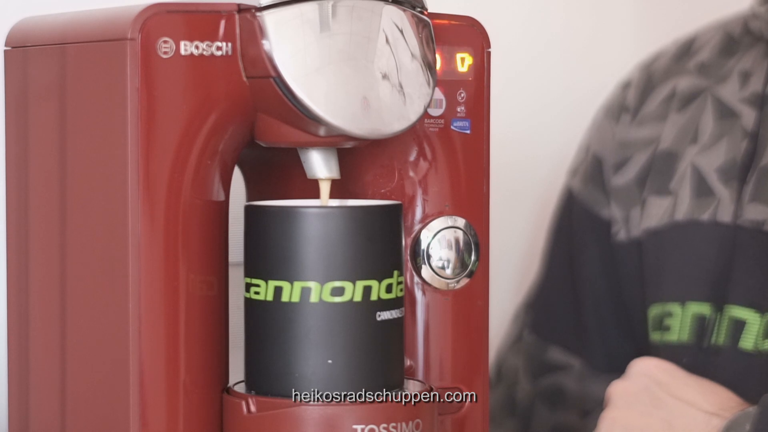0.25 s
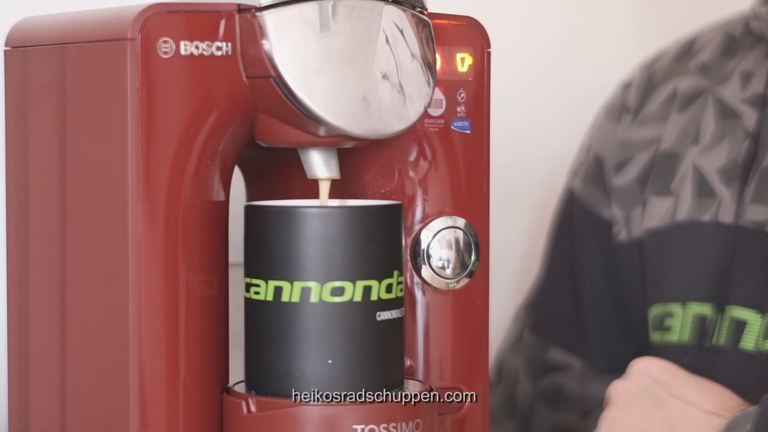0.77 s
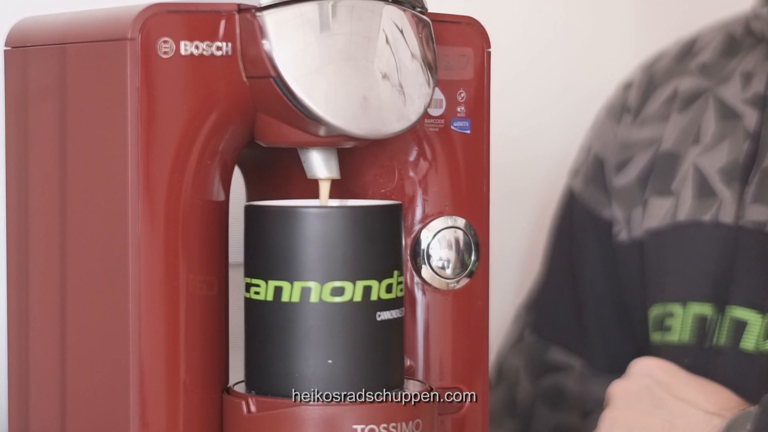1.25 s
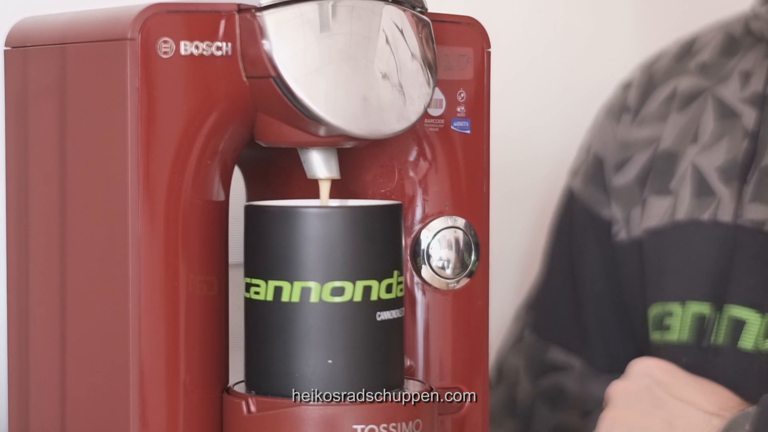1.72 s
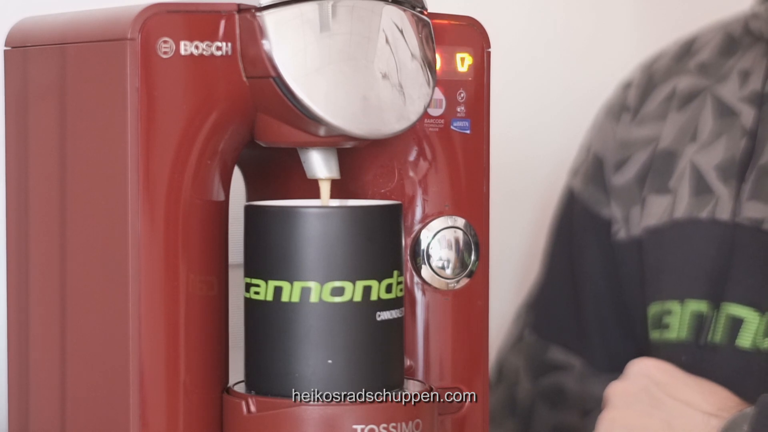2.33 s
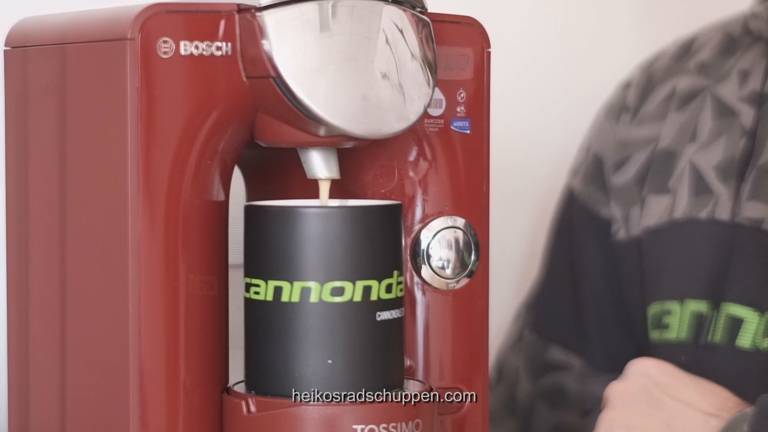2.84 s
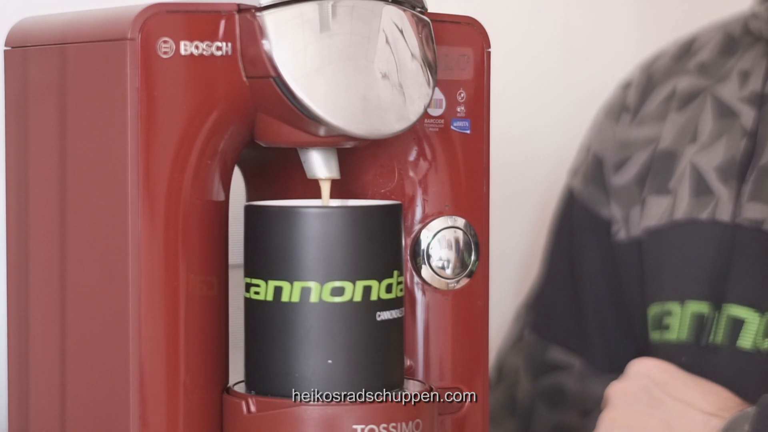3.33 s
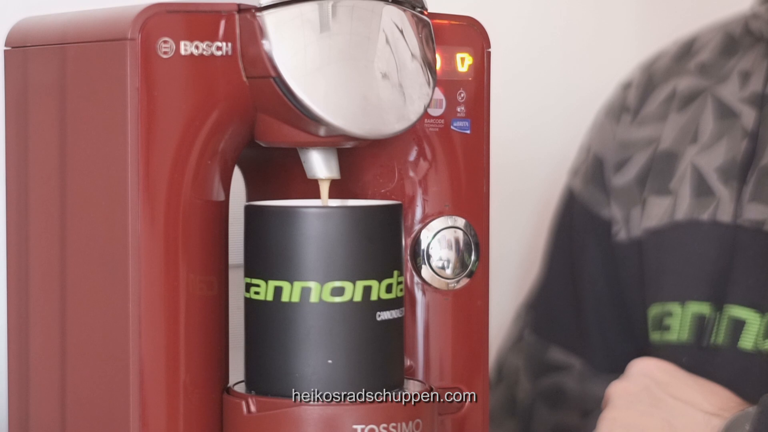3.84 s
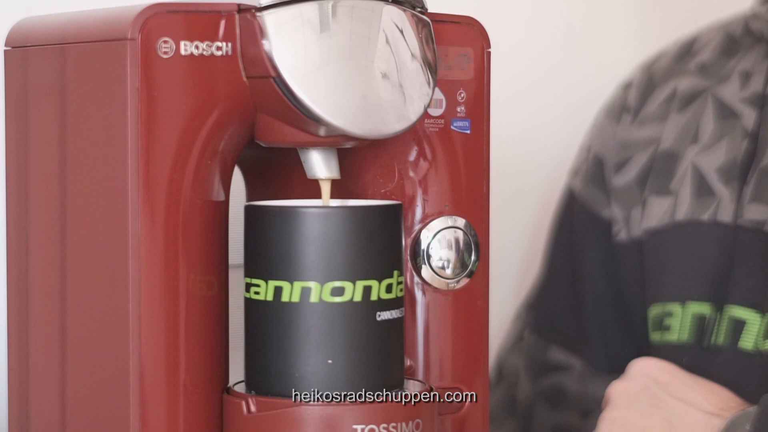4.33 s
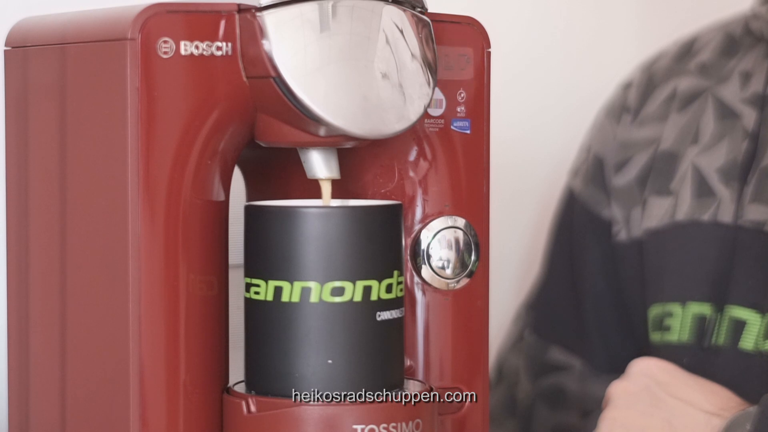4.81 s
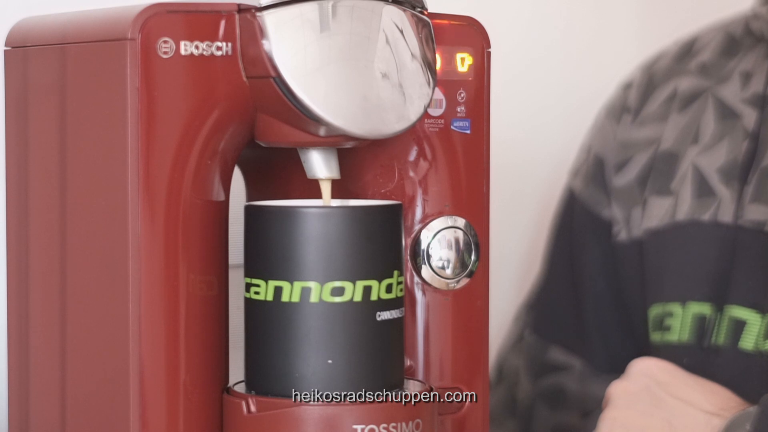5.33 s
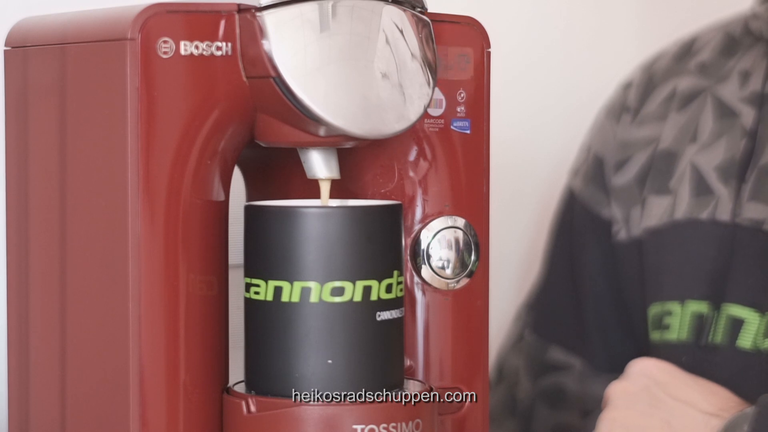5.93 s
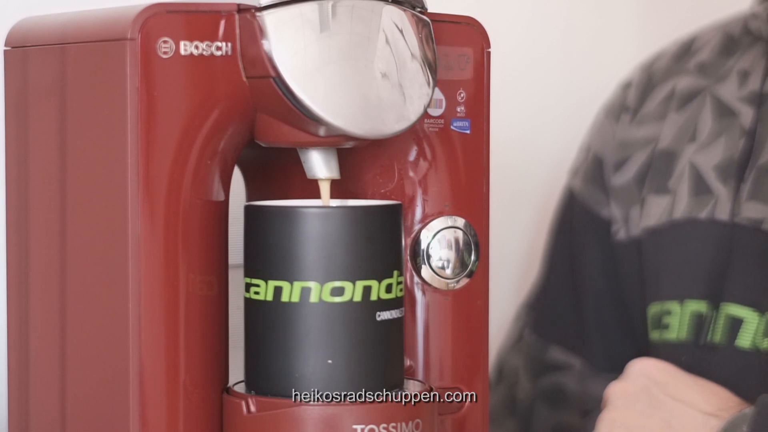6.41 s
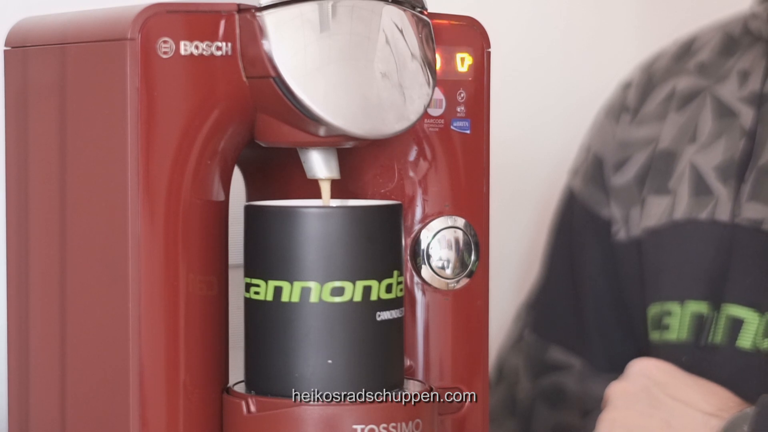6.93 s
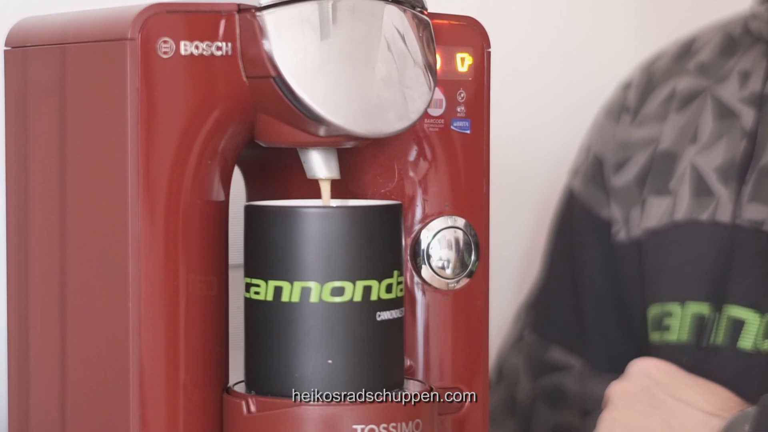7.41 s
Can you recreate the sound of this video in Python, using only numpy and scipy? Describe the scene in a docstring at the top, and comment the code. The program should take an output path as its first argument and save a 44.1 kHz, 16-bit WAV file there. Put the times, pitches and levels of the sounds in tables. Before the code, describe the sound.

A steady electric pump hum with a light rattle and a faint pour of coffee opens the sound, then stops after about three seconds. Quiet crackling and ticking of heating water gives way to louder wet sputtering and bursts of steam hiss, ringing hollowly in a mug. Near the end the coffee machine vents with a single hollow thump and a few feeble spurts. The microphone is close, in a small, still room.

```python
"""A capsule coffee machine fills a mug, close by in a small, quiet room.
First its mains-driven piston pump buzzes and rattles while coffee pours; near 3 s it cuts out.
Water then simmers and ticks in the heater. From 4.7 s steam drives the last coffee through the
spout in gurgling, hissing spurts. At 7.1 s the brewing chamber vents with one hollow thump,
and a few weak spurts follow."""
import sys
import numpy as np
from scipy import signal
from scipy.fft import rfft, irfft
from scipy.io import wavfile
from scipy.ndimage import uniform_filter1d

SR = 44100
rng = np.random.default_rng(int(sys.argv[2]) if len(sys.argv) > 2 else 0)


def wav_record(signal):
    """Record a signal, one row per channel, as 16-bit PCM in the file named by sys.argv[1]."""
    frames = np.transpose(np.atleast_2d(signal))
    bounded = np.clip(frames, -1, 1)
    # unit amplitude maps onto the largest positive 16-bit level
    quanta = np.round(bounded * 32767).astype(np.int16)
    wavfile.write(sys.argv[1], SR, quanta)


N = 337806
TIME = np.arange(N) / SR
MAINS_HZ = 49.9955  # also the pump's stroke rate
EMPTYING_S = (4.4, 6.57)  # the capsule runs dry between these times


def undb(db):
    """Decibels to gain."""
    return np.exp(np.asarray(db) * (np.log(10) / 20))


def unit(x):
    """Scale to rms 1."""
    return x / np.sqrt(np.mean(x ** 2) + 1e-18)


def walk(rate):
    """Random levels held 1 / rate s and slewed; rms 1."""
    hold = max(int(SR / rate), 1)
    return unit(uniform_filter1d(rng.standard_normal(N)[np.arange(N) // hold], hold))


def burst(start, decay, rise):
    """Envelope with a quick attack and an exponential decay."""
    age = np.maximum(TIME - start, 0)
    return (1 - np.exp(-age / rise)) * np.exp(-np.minimum(age / decay, 40))


def swell(start, rise, length, fall, sag_db=0):
    """Envelope that rises, sags by sag_db a second, and releases after its length."""
    age = np.maximum(TIME - start, 0)
    release = np.exp(-np.clip((age - length) / fall, 0, 40))
    return np.minimum(age / rise, 1) * undb(-sag_db * age) * release


def together(envelopes):
    """Joint level of overlapping noisy sounds: their powers add."""
    return np.sqrt(sum(e ** 2 for e in envelopes))


def shape(x, gain_at, size=8192):
    """Minimum-phase EQ from a gain curve: it rings after the blow, never before."""
    hz = np.maximum(np.arange(size // 2 + 1) * SR / size, 1)
    cepstrum = irfft(np.log(gain_at(hz) + 1e-6))
    cepstrum[1:size // 2] *= 2
    cepstrum[size // 2 + 1:] = 0
    impulse = irfft(np.exp(rfft(cepstrum)))
    return signal.fftconvolve(x, impulse)[:len(x)]


def colour(x, points):
    """EQ through (f/Hz, level/dB) points, with steep skirts beyond the ends."""
    f, db = np.transpose(points)
    skirt = lambda hz: np.minimum(1, np.minimum(hz / f[0], f[-1] / hz)) ** 4
    return shape(x, lambda hz: undb(np.interp(np.log(hz), np.log(f), db)) * skirt(hz))


def ringing(modes, hz):
    """Gain of (f/Hz, width/Hz, level/dB) resonances; neighbours cancel in the valleys."""
    return np.abs(sum(undb(db) / (1 + 2j * (hz - f) / width) for f, width, db in modes))


def resonate(x, modes, low_hz, high_hz):
    """Ring a body that radiates between two edges; white noise keeps its level."""
    rolloff = lambda hz: np.sqrt((1 + (low_hz / hz) ** 12) * (1 + (hz / high_hz) ** 12))
    return shape(x, lambda hz: unit(ringing(modes, hz) / rolloff(hz)))


def pops(rate, spread_db):
    """Crackle: random clicks of uneven size; rms 1."""
    size = undb(spread_db * np.minimum(rng.exponential(size=N), 4))
    return unit((rng.random(N) < rate / SR) * size * rng.choice([-1, 1], N))


def bubbles(rate, low_hz, high_hz, cycles, spread_db):
    """Small air bubbles, each a short ring that rises a little in pitch; rms 1."""
    out, age = np.zeros(N + 2048), TIME[:2048]
    for when, pitch, size in rng.random((int(rate * N / SR), 3)):
        hz, at = low_hz * (high_hz / low_hz) ** pitch, int(when * N)
        life = age * hz / cycles
        chirp = 1 + .03 * np.minimum(life, 4)
        ring = np.sin(2 * np.pi * hz * age * chirp) * np.exp(-life)
        out[at:at + len(age)] += ring * undb(-spread_db * np.log(.03 + size))
    return unit(out[:N])


# EQ of the room bed: f/Hz, level/dB
ROOM_EQ = [(25, -14), (59, -6), (107, -8.5), (200, -13.5), (582, -14), (970, -17.5), (3530, -22),
           (5400, -20.5), (6400, -22), (6920, -26), (15500, -25.5)]

def room_tone(level_db=-41.5):
    """Faint rumble and hiss of the still room."""
    return unit(colour(rng.standard_normal(N), ROOM_EQ)) * undb(level_db)


# EQ of the reflected sound: f/Hz, level/dB
REVERB_EQ = [(60, -23), (200, -25), (350, -18), (700, -13), (1400, -10), (2800, -6.5), (5600, -5.5),
             (16000, -7)]

def reflections(x, t60=0.27):
    """Short, bright reverb off the counter and walls."""
    age = TIME[:SR // 2]
    tail = rng.standard_normal(len(age)) * np.exp(-np.log(1000) * age / t60) * (age > .001)
    tail /= np.sqrt(np.sum(tail ** 2))
    return colour(signal.fftconvolve(x, tail)[:N], REVERB_EQ)


def draining(x, modes, low_hz, high_hz):
    """Crossfade a cavity's ring from full to empty as the coffee runs out."""
    full = resonate(x, [(hz, width, db) for hz, width, db, _ in modes], low_hz, high_hz)
    empty = resonate(x, [(hz, width, db) for hz, width, _, db in modes], low_hz, high_hz)
    drained = np.interp(TIME, EMPTYING_S, [0, 1])
    return (1 - drained) * full + drained * empty


# Air modes of mug and capsule: f/Hz, width/Hz, level full/dB, level empty/dB
MUG_MODES = [(191, 8.9, -5, -13), (245.4, 8.1, 3.5, 4.5), (342, 48, -11, -7), (410.6, 25.6, 3.5, 1),
             (562.7, 16, 8, -1), (618, 23, -1.5, -4), (667, 16, 0, 1), (705, 23, 4, -11),
             (750, 26, 1.5, -8), (807, 23.3, 1.5, 7), (846.3, 14.4, 1.5, 6.5), (920, 28, -8, -5)]

def mug(x):
    """The hollow ring of the mug and capsule."""
    return draining(x, MUG_MODES, 210, 907)


# Modes of the spout's throat: f/Hz, width/Hz, level full/dB, level empty/dB
THROAT_MODES = [(1358, 27, 3.5, 0.5), (1494, 65, 2.5, 6.5), (1631, 180, -0.5, 2.5), (1985, 130, 1.5, -5.5),
                (2186, 102, 2, -0.5), (2520, 43, -3, -6), (2750, 68, -7, -17)]

def throat(x):
    """The higher ring of the spout's throat."""
    return draining(x, THROAT_MODES, 1200, 3400)


def heater_shell(x):
    """The heater's casing muffles the treble; rms 1."""
    return unit(colour(x, [(130, 2.5), (900, 3), (2100, 4.5), (3100, -12), (8000, -13)]))


# Surges of the boil: t/s, attack/s, length/s, level/dB
BOIL_SURGES = [(3.14, 0.018, 0.31, -39), (3.37, 0.017, 0.036, -36.5), (3.472, .02, 0.05, -39.5),
               (3.557, .01, 0.035, -41.5), (3.87, 0.024, 0.31, -41), (4.132, 0.018, 0.034, -31.5),
               (4.221, 0.027, 0.081, -31.5), (4.334, 0.071, 0.33, -39)]

def simmer(chug_hz=25.1, chug_fade_s=(3.3, 4.5)):
    """Water boils up in surges: the first steam bubbles chug through, then the crackle evens out."""
    crackle = undb(-8) * heater_shell(pops(1500, 3.4))
    crackle += undb(-8.5) * mug(pops(1500, 1.1))
    crackle += undb(-11.5) * throat(pops(1500, 1.7))
    phase = (TIME - BOIL_SURGES[0][0] + .002 * walk(8)) * chug_hz % 1
    chug = unit(np.exp(-phase / .3) + .35)
    tremolo = 1 + (chug - 1) * np.interp(TIME, chug_fade_s, [1, 0])
    boil = together(undb(db) * swell(start, rise, length, fall=.062)
                    for start, rise, length, db in BOIL_SURGES)
    return (crackle + undb(-10) * bubbles(260, 654, 2770, 1.8, 2.2)) * tremolo * boil


# Ticks in the heater: t/s, level/dB, f/Hz, t60/s
HEATER_TICKS = [(3.41, -18.5, 970, .018), (3.422, -24.5, 766, 0.048), (3.49, -27.5, 934, 0.044),
                (3.52, -29.5, 685, .04), (3.593, -23.5, 1400, 0.01), (3.65, -36, 1310, 0.06),
                (3.9, -40, 2165, 0.49), (3.944, -18, 1970, 0.0023), (4.696, -20.5, 2040, 0.041),
                (4.752, -22.5, 2150, .04)]

def ticks(trim_db=2.5, crack_db=-7.5):
    """Larger bubbles collapse in the heater, each with a crack and a ping."""
    shell = heater_shell(rng.standard_normal(N))
    wobble = walk(250)  # the bubbles change shape as they ring
    out = 0
    for start, db, hz, t60 in HEATER_TICKS:
        tone = np.sin(2 * np.pi * hz * (TIME - start) + wobble)
        ping = .8 * tone * burst(start, t60 / np.log(1000), .00028)
        crack = undb(crack_db) * shell * burst(start, .002, .0001)
        out += undb(db + trim_db) * (ping + crack)
    return out


def heater_bed(rumble_db=-47, whistle_db=-52.5):
    """Water rumbles until it turns to steam; a leak sings faintly throughout."""
    rumble = unit(colour(rng.standard_normal(N), [(70, .5), (400, 1), (600, -11.5)]))
    rumble *= np.interp(TIME, EMPTYING_S, [1, 0])
    whistle = resonate(rng.standard_normal(N), [(5745, 75, 0), (5610, 110, -9)], 5000, 6500)
    return undb(rumble_db) * rumble + undb(whistle_db) * whistle


def each_cycle(start, decay):
    """Envelope retriggered once in every pump cycle; rms 1."""
    return unit(np.exp(-((TIME - start) * MAINS_HZ % 1) / (MAINS_HZ * decay)))


# Ring of the valve: f/Hz, width/Hz, level/dB
VALVE_MODES = [(3080, 180, -10), (3430, 135, -1.5), (3895, 100, 0), (4980, 140, -14)]
# Fits of harder chatter: t/s, length/s, level/dB
VALVE_FITS = [(0.247, .13, -35), (.42, 0.087, -39), (0.51, .11, -38), (0.638, 0.12, -36.5),
              (0.924, 0.023, -34), (1.0, 0.2, -41.5), (1.423, 0.1, -38), (1.74, 0.033, -34),
              (2.08, .28, -40.5), (2.491, .24, -39)]
VALVE_S = 0.0094  # when in each cycle the valve snaps

def valve(settle_s=2.72, settle_db_per_s=38):
    """The valve snaps between strokes, chattering unevenly until full pressure calms it."""
    cycle = np.floor((TIME - VALVE_S + 5e-5 * walk(50)) * MAINS_HZ)
    clicks = unit(np.diff(cycle, prepend=-1))
    snap = unit(.8 * clicks + rng.standard_normal(N) * (each_cycle(VALVE_S, .0035) + .3))
    fits = [undb(db) * swell(start, .0053, length, fall=.01) for start, length, db in VALVE_FITS]
    chatter = together(fits + [undb(-43.5 + 2 * walk(14))])
    settling = undb(-settle_db_per_s * np.maximum(TIME - settle_s, 0))
    return resonate(snap, VALVE_MODES, 2660, 6400) * chatter * settling


# Pump hum as the casing radiates it: harmonic, level/dB
HUM_HARMONICS = [(1, -21.5), (2, -17), (3, -24.5), (4, 1), (5, -3), (6, -24.5), (7, -9.5), (8, -11.5),
                 (9, -4.5), (10, -25), (11, -25), (12, -11), (13, -18), (14, -24), (15, -25.5), (16, -16.5),
                 (17, -20.5), (18, -14), (19, -17.5), (20, -18), (21, -25.5), (22, -20), (23, -22.5),
                 (24, -23.5), (25, -22), (26, -23), (27, -14), (28, -21), (29, -27), (30, -17)]
# Shift in tone under pressure: harmonic, change/dB
STRAIN = [(13, 4), (14, 12), (15, 11.5), (18, -11), (21, -18), (23, 12), (24, 1), (27, -7), (43, 9)]
# The piston lands, rebounds and returns: t in the cycle/s, level/dB
PISTON_KNOCKS = [(0.0164, -3), (0.0206, -11.5), (0.025, -4.5)]
# Thin panels that sing along: f/Hz, width/Hz, level/dB
PANEL_MODES = [(1580, 61, 1.5), (1875, 35, 1), (2124, 57, 0), (2440, 61, -6)]

def pump_hum(drive, buzz_db=-33, panel_db=-21, darken=0.65, count=52, strain_s=(1.6, 2.97)):
    """Piston knocks ring the casing; a weaker stroke lands softly and loses its overtones."""
    orders = np.arange(1, count + 1)
    panels = ringing(PANEL_MODES, orders[len(HUM_HARMONICS):] * MAINS_HZ)
    buzz = np.hypot(undb(buzz_db), undb(panel_db) * panels)  # the panels carry the top overtones
    gains = np.concatenate([undb(np.array(HUM_HARMONICS)[:, 1]), buzz])
    # the knocks set the phases, the casing the levels; the panels scatter the high phases
    knocks = sum(undb(db) * np.exp(-2j * np.pi * MAINS_HZ * orders * at) for at, db in PISTON_KNOCKS)
    response = knocks / np.abs(knocks) * gains / np.sqrt(np.sum(gains ** 2) / 2)
    response *= np.exp(1j * rng.standard_normal(count) * (orders / 22) ** 2)
    # no two strokes share quite the same timing or force
    fundamental = np.exp(2j * np.pi * MAINS_HZ * (TIME + 2.5e-5 * walk(50)))
    wavers = [.7 * walk(2.5) + .9 * walk(40) for _ in range(7)]
    log_force = np.log(drive / drive.max())
    pressure, strain_db = np.interp(TIME, strain_s, [0, 1]), dict(STRAIN)
    out, partial = 0, 1
    for k, gain in zip(orders, response):
        partial = partial * fundamental
        change_db = min(k / 10, 2) * wavers[k % len(wavers)] + strain_db.get(k, 0) * pressure
        out -= np.real(gain * partial) * undb(change_db) * np.exp(darken * log_force * k / 10)
    return out * drive


# EQ of the loose panels' rattle: f/Hz, level/dB
RATTLE_EQ = [(60, -53), (170, -25), (400, -2), (650, -7.5), (1050, -11), (1550, -6.5), (2200, -8),
             (2800, -15.5), (4500, -21), (7500, -28), (15000, -31)]

def pump(hum_db=-21.5, off_s=2.957, coast_db_per_s=122):
    """The pump hums, shakes its panels, squirts through its valve and pours coffee, then coasts out."""
    running = undb(-np.clip(coast_db_per_s * (TIME - off_s), 0, 120))
    drive = undb(hum_db) * running
    landing = PISTON_KNOCKS[0][0]
    rattle = unit(colour(pops(9000, 3.5) * each_cycle(landing, .09), RATTLE_EQ))
    panels = resonate(rng.standard_normal(N) * each_cycle(landing, .0078), PANEL_MODES, 1500, 2400)
    chatter = undb(-1.5) * valve() * running ** 2
    squirt = rng.standard_normal(N) * each_cycle(VALVE_S - .0018, .002) * undb(3 * walk(20))
    squirt = unit(colour(squirt, [(4500, -9), (6500, -5), (9000, -7), (15000, -7)]))
    pour = bubbles(260, 482, 2330, 2.5, 3)
    texture = undb(-11) * rattle + undb(-20) * panels + undb(-29) * squirt + undb(-17) * pour
    # loose parts and the stream need a hard stroke, so they fade before the hum
    return pump_hum(drive) + drive * running * texture + chatter


# Pressure shocks: t/s, push/dB, crack/dB, pocket f/Hz, pocket level/dB
VENT_SHOCKS = [(7.082, -25, -13, 2220, -14), (7.084, -27, -21, 580, -7), (7.097, -15.5, -17, 563, -14),
               (7.118, -22, -21, 302, -15), (7.135, -20.5, -23, 240, -28)]
# Ring of the brewing chamber: f/Hz, level/dB, t60/s
CHAMBER_MODES = [(195.5, -7.5, 0.3), (247, -3.5, 0.34), (343, -11, 0.15), (430, -4.5, 0.18),
                 (550, -4, 0.09), (707, -12.5, 0.24), (1489, -2, 0.11)]

def thump(low_cut_hz=135):
    """The chamber vents in quick shocks: each cracks, frees a ringing steam pocket and shakes it."""
    crack_eq = [(300, 10), (600, 4), (1000, .5), (1500, -1), (2200, -3), (3000, -14.5),
                (8000, -13), (15000, -16)]
    crack = unit(colour(rng.standard_normal(N), crack_eq))
    age = TIME[:SR // 2]
    ring = sum(undb(db) * np.sin(2 * np.pi * hz * age) * np.exp(-np.log(1000) * age / t60)
               for hz, db, t60 in CHAMBER_MODES)
    pushes, out = np.zeros(N), 0
    for start, push_db, crack_db, hz, pocket_db in VENT_SHOCKS:
        pushes[int(start * SR)] = undb(push_db)
        out += undb(crack_db) * crack * burst(start, .0062, .00062)
        out += undb(pocket_db) * np.sin(2 * np.pi * hz * (TIME - start)) * burst(start, .0037, .0013)
    out += signal.fftconvolve(pushes, ring)[:N]
    # a small housing radiates no deep bass
    return signal.sosfilt(signal.butter(4, low_cut_hz, "high", fs=SR, output="sos"), out)


# EQ of the plain steam jet: f/Hz, level/dB
STEAM_EQ = [(2800, -3), (3160, -6.5), (3700, -1), (5500, -4), (6800, -4), (7900, -4.5), (8700, -9.5),
            (10400, -10.5), (11400, -10.5), (12500, -13), (15500, -19.5)]
# Peaks of the nozzle's bore: f/Hz, width/Hz, level over the jet/dB
NOZZLE_MODES = [(2770, 48, -2), (3660, 48, 3.5), (4390, 150, 2), (4880, 39, 4), (5320, 99, 5),
                (5980, 57, 4), (7920, 130, -1), (11240, 220, 2.5)]

def nozzle(x):
    """Hiss coloured by the steam jet and its narrow bore; rms 1."""
    return unit(shape(colour(x, STEAM_EQ), lambda hz: np.hypot(1, ringing(NOZZLE_MODES, hz))))


# Single spits: t/s, level/dB, decay/s, hiss offset/dB
SPITS = [(.037, -41, 0.0097, 13.5), (.077, -44.5, 0.039, 14), (0.177, -40.5, 0.014, 12.5),
         (1.958, -43, 0.0034, 17), (4.419, -44, 0.055, 7), (4.484, -24.5, 0.01, 0),
         (4.546, -36.5, .016, -2), (4.633, -32.5, 0.02, -3.5), (4.692, -32, 0.025, -1.5),
         (4.745, -24.5, 0.019, -2.5), (4.885, -23, 0.026, 1.5), (5.007, -17, .018, -8),
         (5.055, -15, 0.015, -13), (5.275, -18.5, 0.02, -6), (5.337, -18.5, 0.019, -9),
         (5.496, -13, 0.0065, -11), (5.576, -24.5, 0.0091, -2), (5.627, -28, 0.014, -7),
         (5.712, -22.5, 0.012, -5), (5.784, -17, 0.015, -6), (5.831, -20.5, 0.016, -1),
         (5.984, -23, 0.01, -4), (6.043, -17.5, 0.015, -3.5), (6.095, -12.5, 0.011, -11),
         (6.176, -17, 0.011, -5), (6.24, -18.5, 0.0094, -6), (6.302, -18, 0.014, -8),
         (6.648, -24, 0.018, -10), (6.705, -21.5, 0.016, 0.5), (6.829, -21, 0.0083, -3),
         (6.94, -33, 0.015, 8), (7.237, -26, 0.013, -4), (7.403, -28.5, 0.016, 1.5),
         (7.435, -22, 0.014, -8), (7.603, -34, 0.0072, 7.5)]

def spits(rise=0.002045, pop_db=-13, plop_db=-10.5):
    """Drops blown from the spout pop and splutter, ringing throat and mug, with a puff of hiss."""
    splutter, hiss = pops(9000, 2.2), nozzle(rng.standard_normal(N))
    wet, puffs = np.zeros(N), 0
    for start, db, decay, hiss_db in SPITS:
        envelope = undb(db) * burst(start, decay, rise)
        wet += envelope * splutter
        wet[int((start + rise) * SR)] += undb(pop_db) * np.sqrt(np.sum(envelope ** 2))  # the film pops
        puffs += undb(hiss_db) * envelope * hiss
    return throat(wet) + undb(plop_db) * mug(wet) + puffs


# Spurts at the spout: t/s, attack/s, length/s, liquid/dB, spray/dB, steam/dB
SPURTS = [(4.745, .015, 0.024, -32, -38, -39), (4.802, 0.021, 0.029, -20.5, -24, -31.5),
          (4.869, 0.027, 0.058, -18, -19.5, -26.5), (4.971, 0.027, 0.13, -17.5, -19.5, -25.5),
          (5.105, 0.02, 0.078, -17, -26, -31.5), (5.215, 0.07, 0.13, -19, -25.5, -29.5),
          (5.448, 0.038, 0.32, -26, -31, -31.5), (5.786, 0.02, 0.21, -22, -27, -30),
          (5.905, 0.031, 0.24, -19.5, -22, -26.5), (6.176, 0.042, 0.14, -21.5, -25.5, -29.5),
          (6.333, 0.016, .1, -29, -36, -33.5), (6.547, 0.025, 0.057, -27, -30, -31.5),
          (6.593, 0.041, 0.15, -20, -27, -32), (6.768, 0.018, 0.075, -30.5, -34.5, -30.5),
          (6.911, 0.011, 0.24, -31.5, -37, -33.5), (7.218, 0.011, 0.078, -34, -36, -46),
          (7.4, 0.019, 0.028, -39, -28, -32)]
# Brief clogs: t/s, half-width/s, change/dB
CLOGS = [(4.962, 0.013, -2), (5.44, 0.033, -0.5), (5.548, 0.025, -4), (6.019, 0.015, -4.5),
         (6.51, 0.031, -2)]

def flow(steam_on_s=4.74, fall=0.076):
    """Envelopes of liquid, spray and steam: spurts that lose pressure, over a leak, ducked by clogs."""
    leak = np.clip((TIME - steam_on_s) / .22, 0, 1)
    dribble = undb(-26.5 - 6 * (TIME - steam_on_s))
    liquid, spray, steam = [leak * dribble], [leak * undb(-41)], [leak * undb(-38.5)]
    for start, rise, length, liquid_db, spray_db, steam_db in SPURTS:
        liquid.append(undb(liquid_db) * swell(start, rise, length, fall, sag_db=2.5))
        spray.append(undb(spray_db) * swell(start, rise, length, fall, sag_db=17))
        steam.append(undb(steam_db) * swell(start, rise, length, fall, sag_db=16.5))
    opening = undb(sum(db * np.exp(-((TIME - at) / width) ** 2) for at, width, db in CLOGS))
    return opening * together(liquid), opening * together(spray), opening * together(steam)


def slugs(rate=70, decay=0.007):
    """Sputter of the jet: it jumps as each slug of coffee clears, then falls back; rms 1."""
    kicks = (rng.random(N) < rate / SR) * rng.exponential(size=N)
    added_power = signal.lfilter([1], [1, -np.exp(-1 / (decay * SR))], kicks)
    return unit(np.sqrt(1 + added_power))


def spout(liquid_level, spray_level, steam_level):
    """Coffee breaks up in the steam: big bubbles ring the mug, droplets the throat; the jet hisses."""
    jet = slugs()
    gurgle = mug(pops(1400, 1.9) * jet) * liquid_level
    spray = throat(pops(2500, .64) * jet) * spray_level
    steam = nozzle(pops(14000, 2.5) * jet) * steam_level
    return undb(-1.5) * gurgle + undb(-.3) * spray + undb(.7) * steam


def scene(mains_db=-53, right_lag_s=1.2e-5, left_db=0.4):
    """Mid/side mix: the machine stands a little left of centre in a quiet room with mains hum."""
    mains = undb(mains_db) * np.sin(2 * np.pi * MAINS_HZ * TIME)
    levels = flow()
    machine = pump() + simmer() + ticks() + heater_bed() + spout(*levels) + spits() + thump()
    direct = machine + room_tone() + mains
    mid = direct + undb(-5) * reflections(direct)
    # the spray scatters all over the mug, so each side catches different droplets
    scattered = colour(spout(*levels) + room_tone(), REVERB_EQ)
    side = undb(-3) * reflections(direct) + undb(-1) * scattered
    side += undb(-19) * colour(direct, REVERB_EQ)  # the treble beams to the left
    hz = np.arange(N // 2 + 1) * SR / N
    late_mid = irfft(rfft(mid) * np.exp(-2j * np.pi * right_lag_s * hz), N)
    return np.array([(mid + side) * undb(left_db / 2), (late_mid - side) * undb(-left_db / 2)])


def record(dry, top_hz=15700):
    """A steep high cut on the mix."""
    return signal.sosfilt(signal.ellip(10, .2, 80, top_hz, fs=SR, output="sos"), dry)


dry = scene()
out = record(dry)
wav_record(out)
```